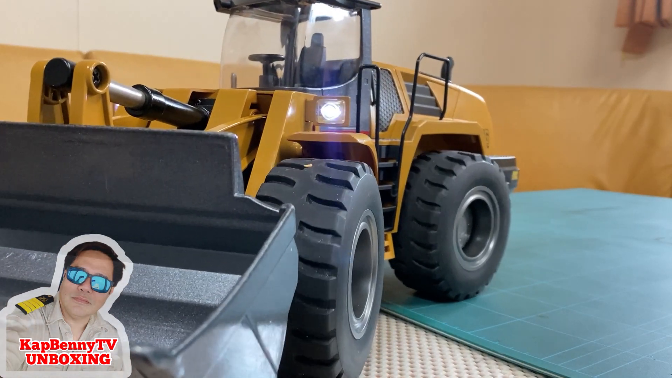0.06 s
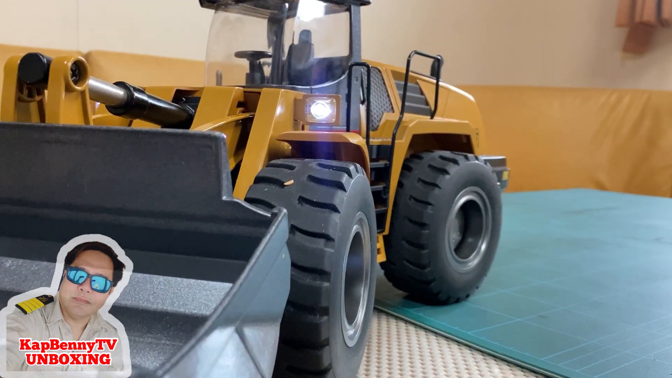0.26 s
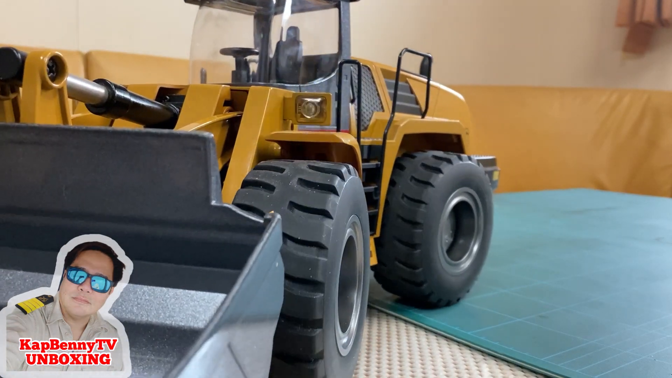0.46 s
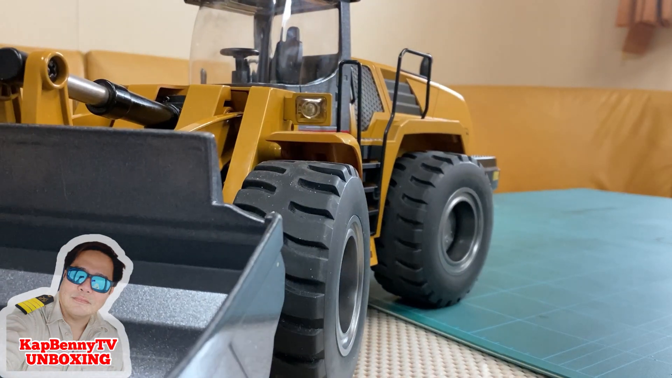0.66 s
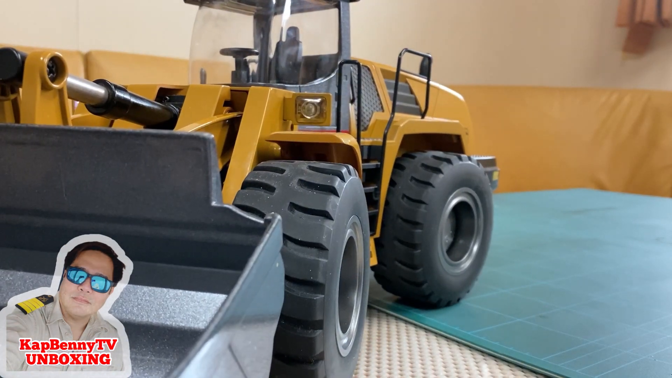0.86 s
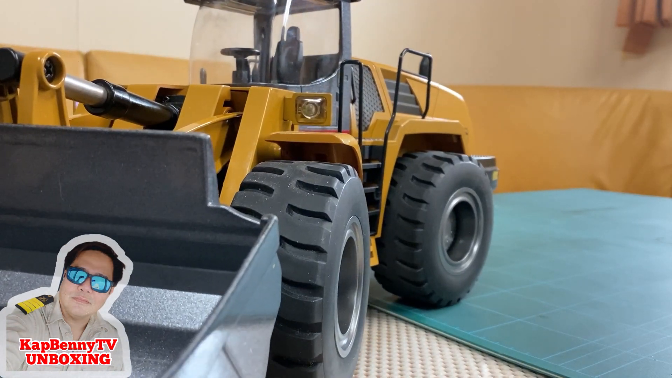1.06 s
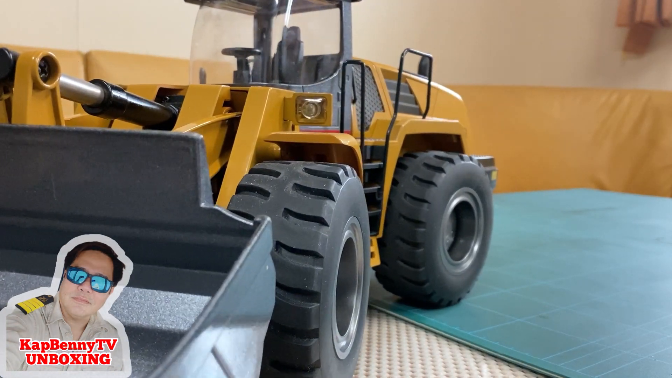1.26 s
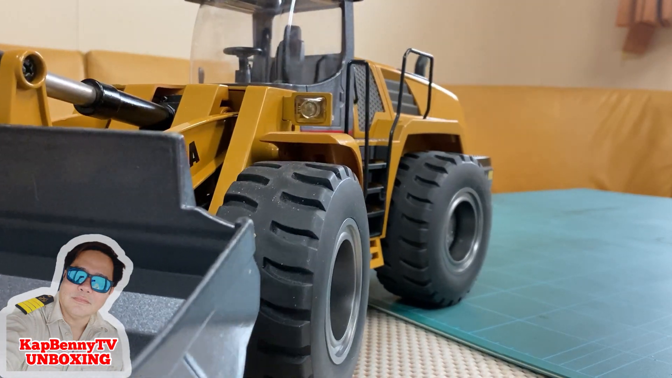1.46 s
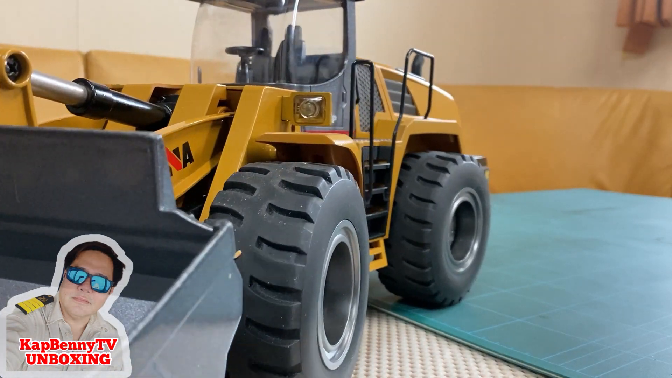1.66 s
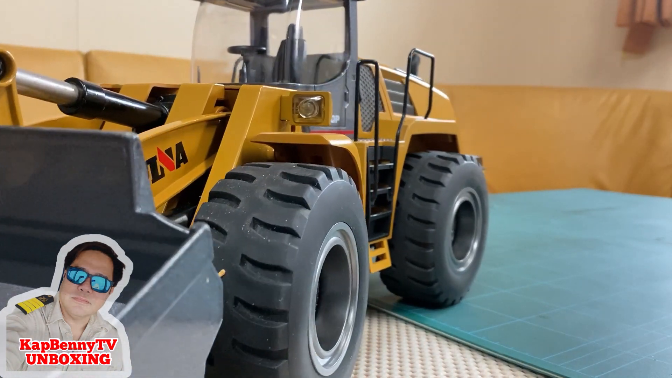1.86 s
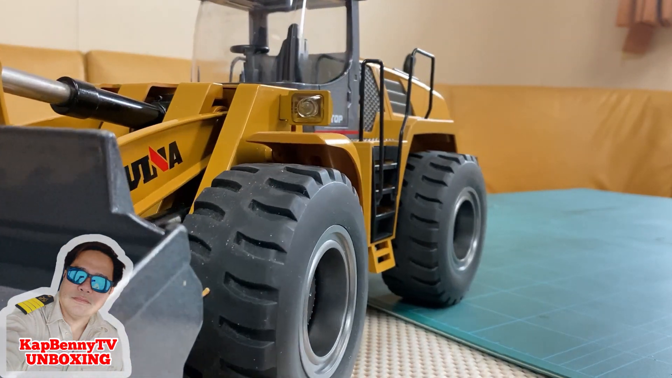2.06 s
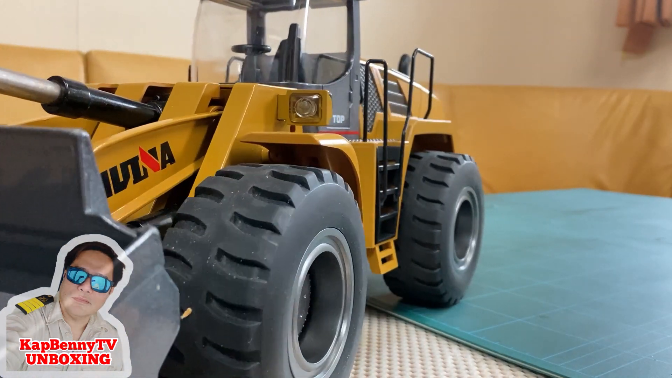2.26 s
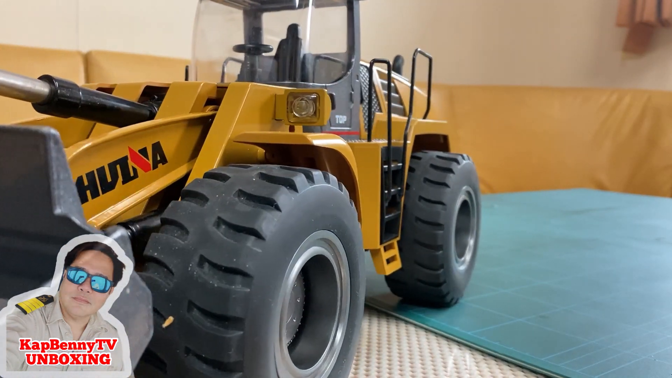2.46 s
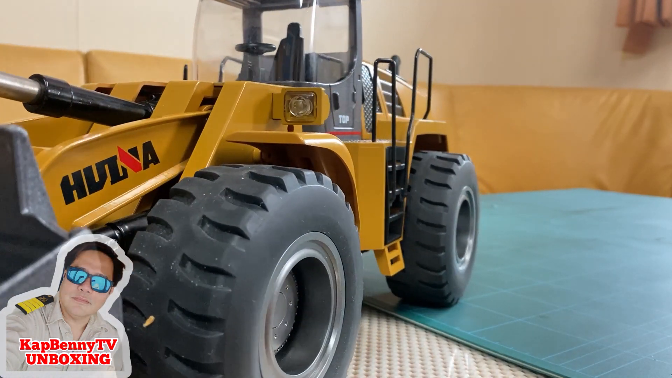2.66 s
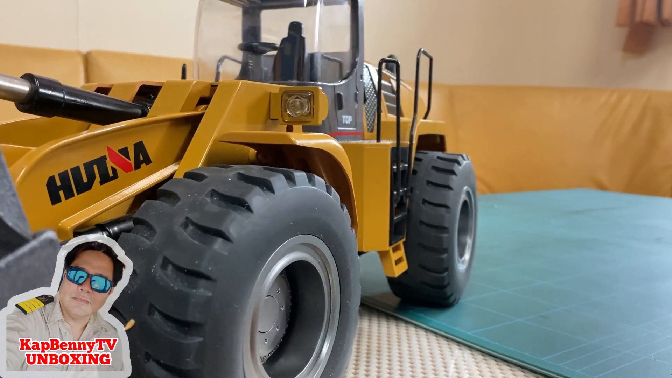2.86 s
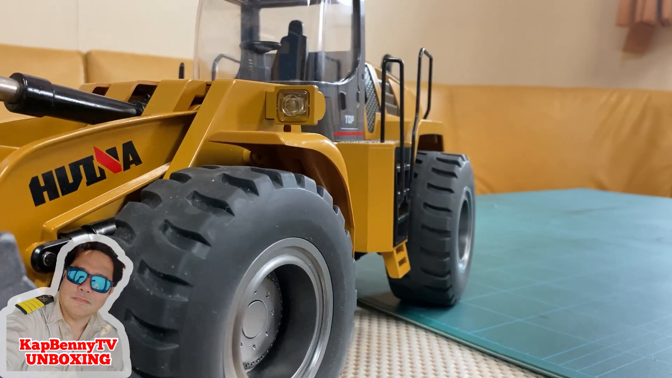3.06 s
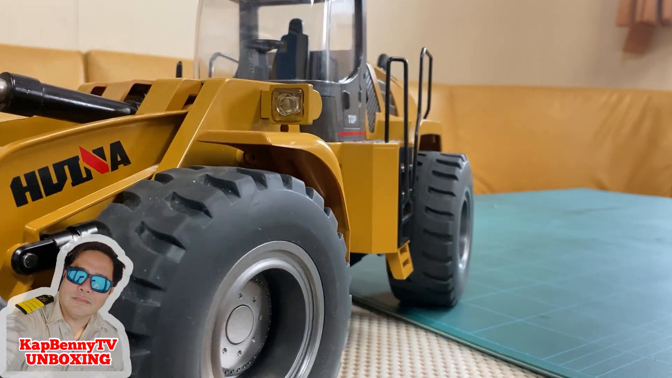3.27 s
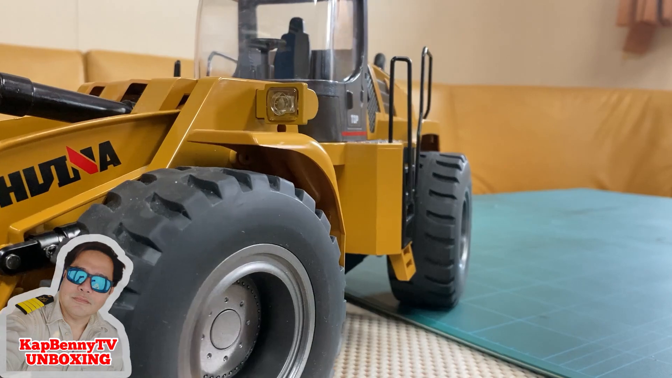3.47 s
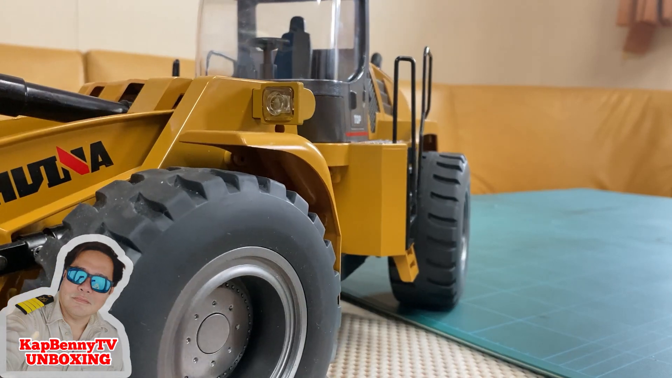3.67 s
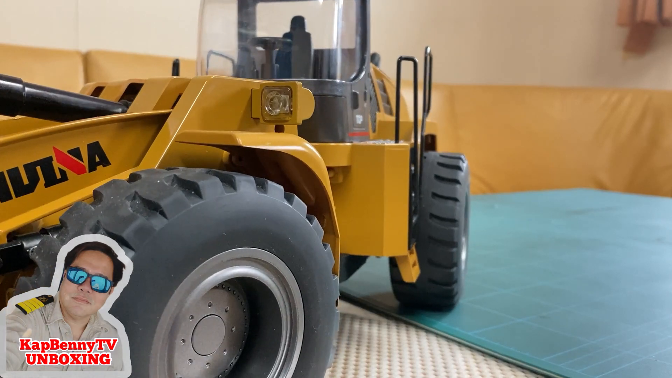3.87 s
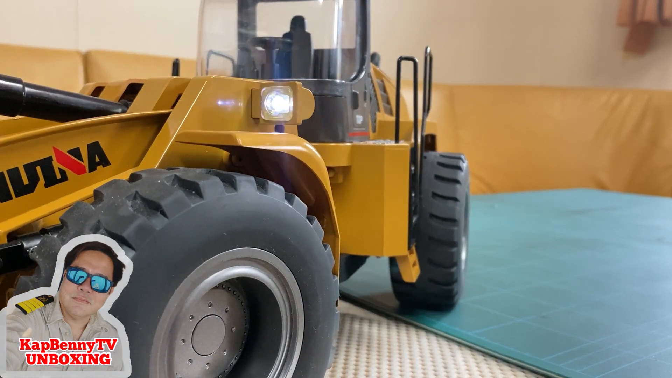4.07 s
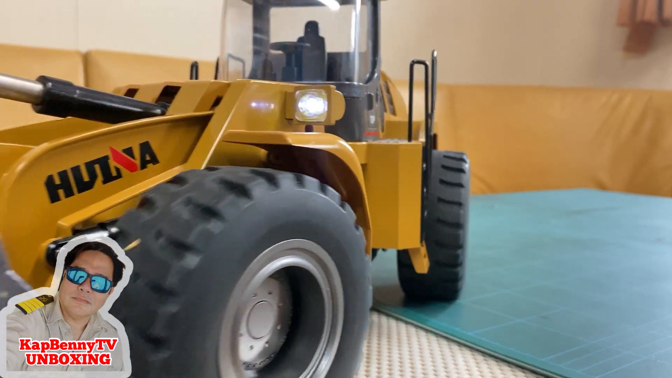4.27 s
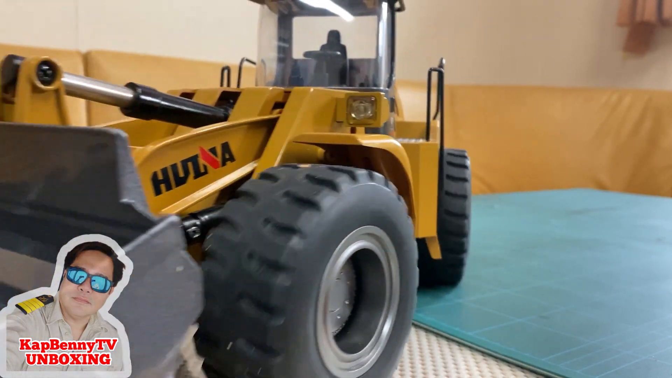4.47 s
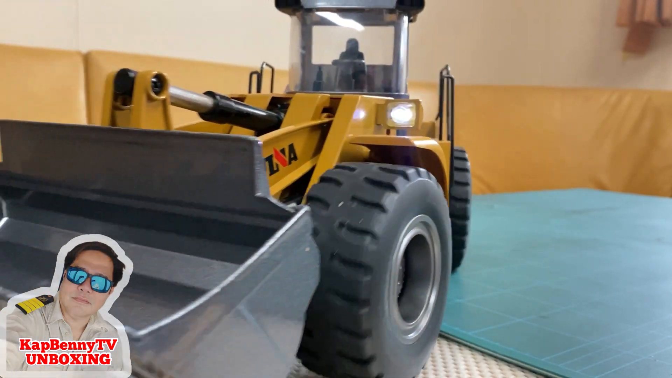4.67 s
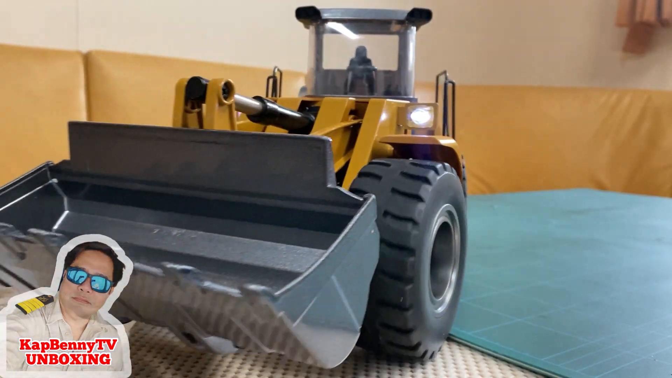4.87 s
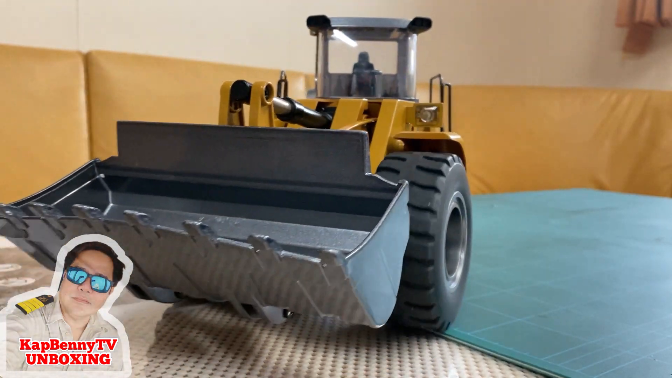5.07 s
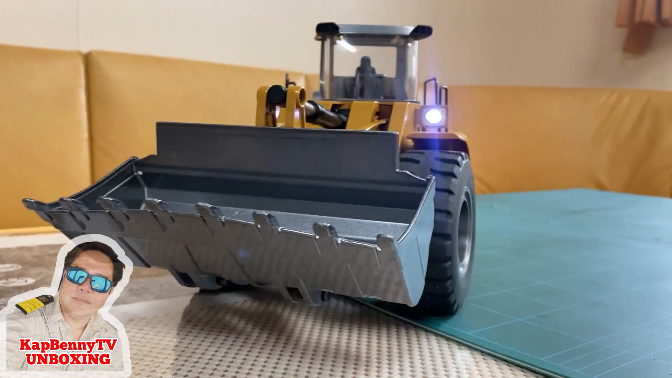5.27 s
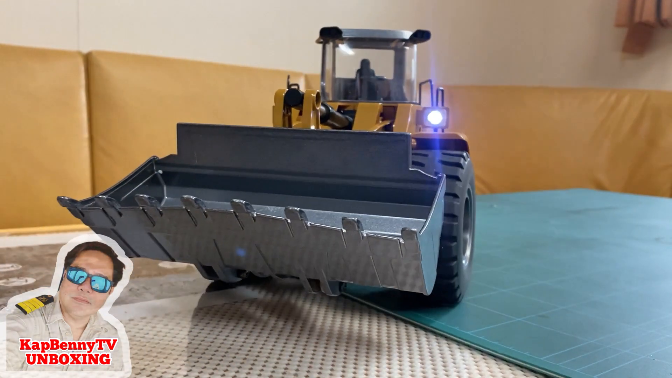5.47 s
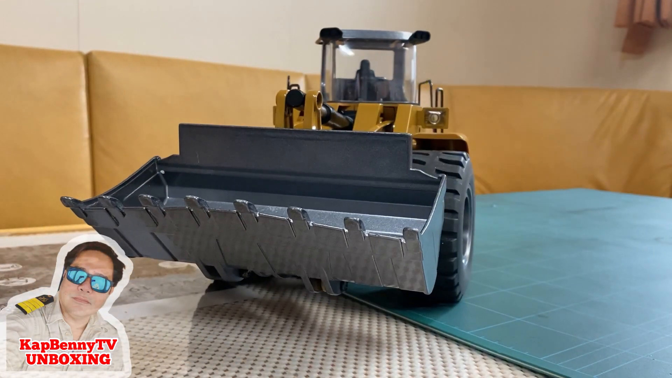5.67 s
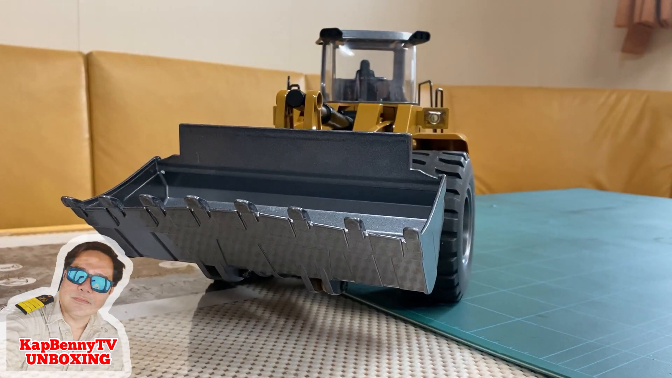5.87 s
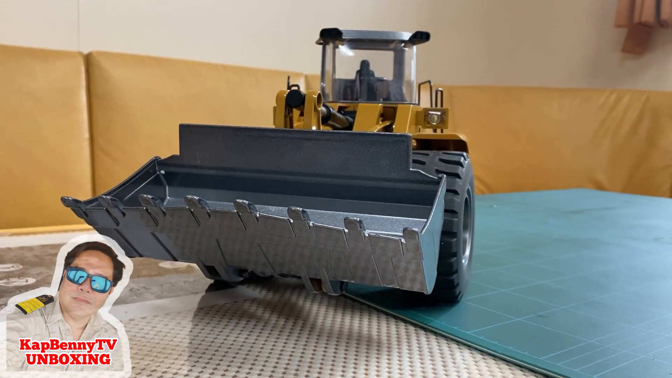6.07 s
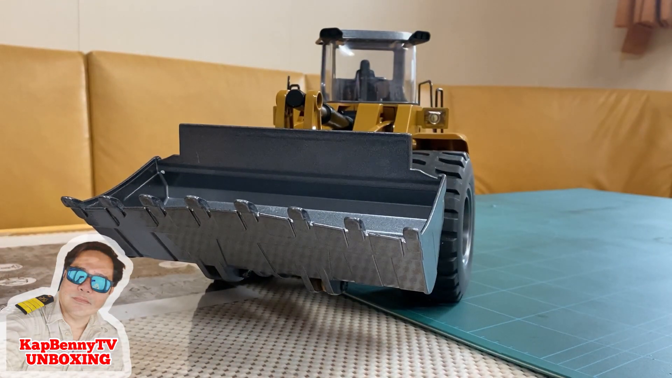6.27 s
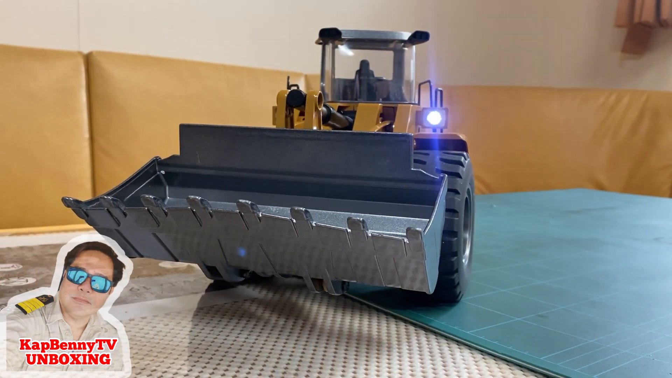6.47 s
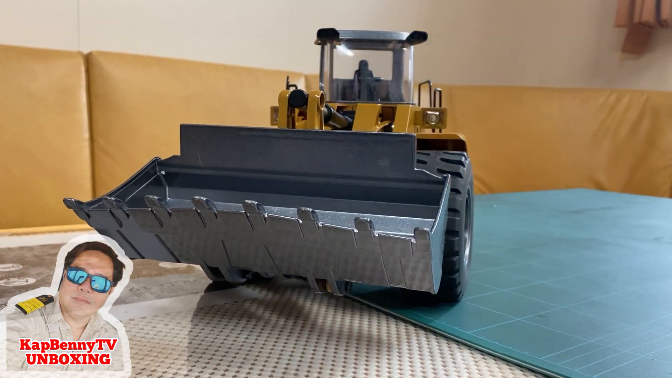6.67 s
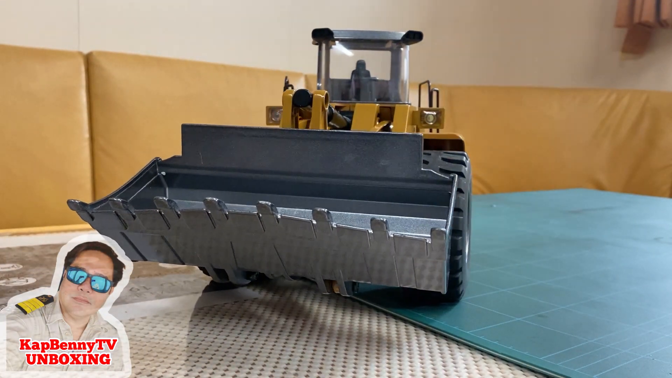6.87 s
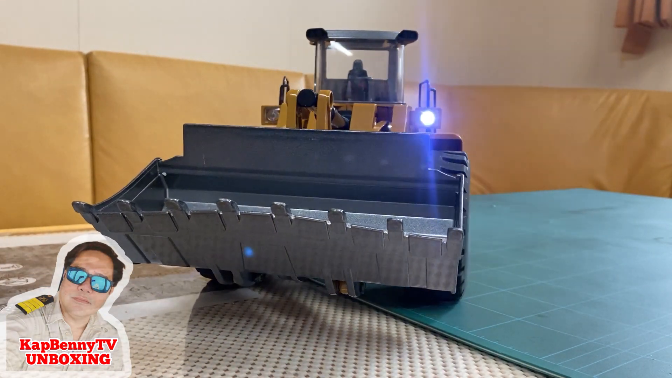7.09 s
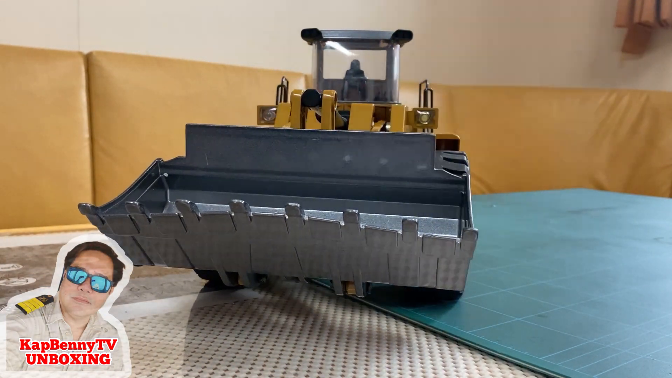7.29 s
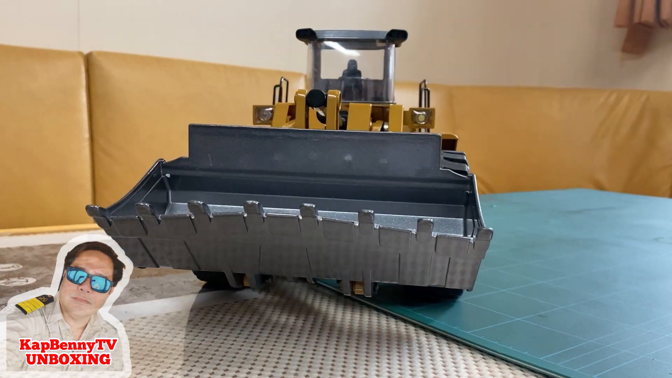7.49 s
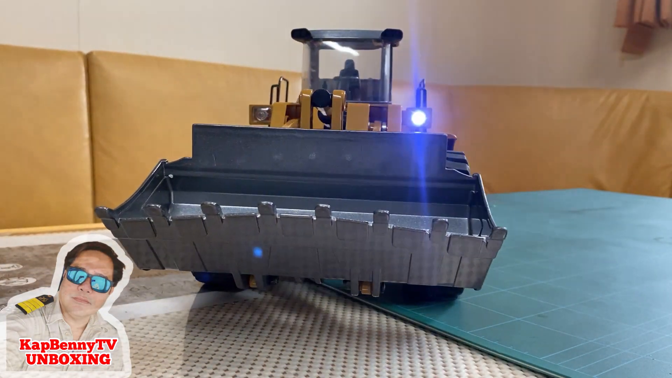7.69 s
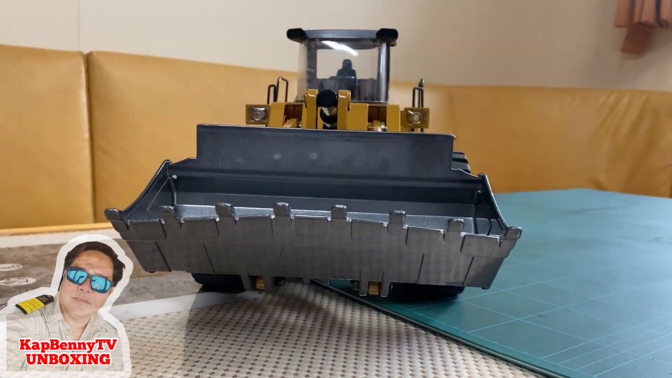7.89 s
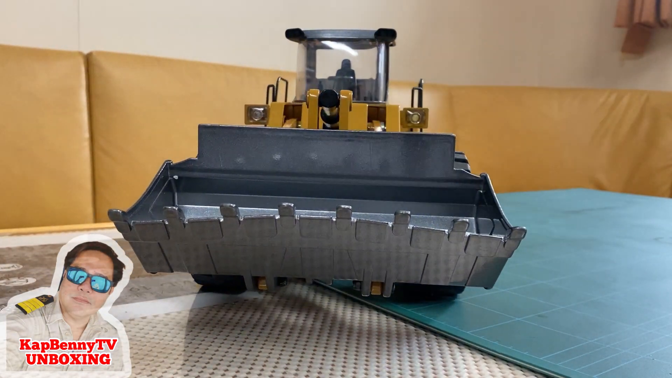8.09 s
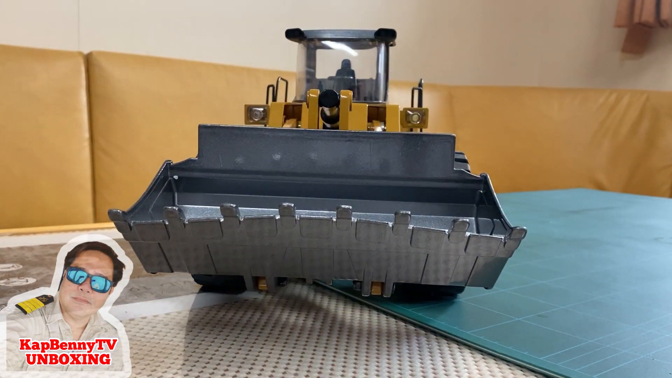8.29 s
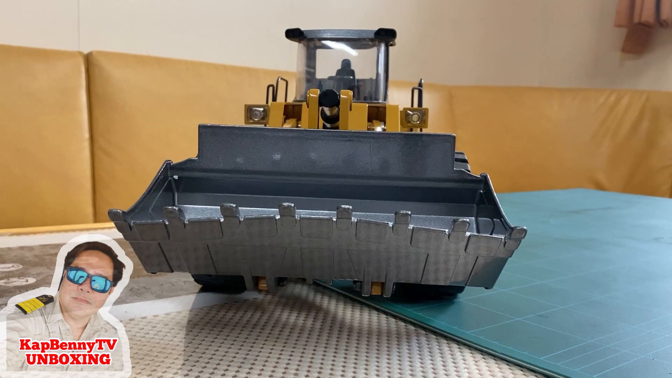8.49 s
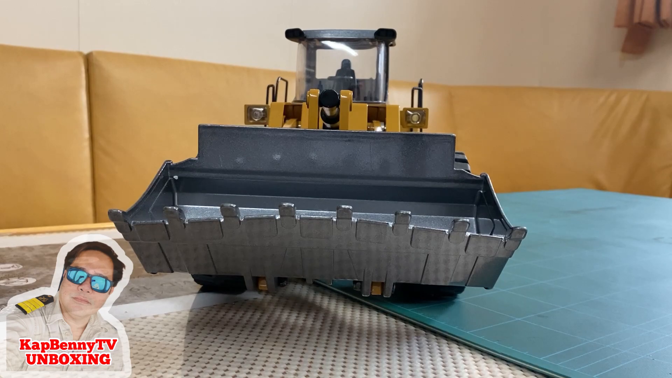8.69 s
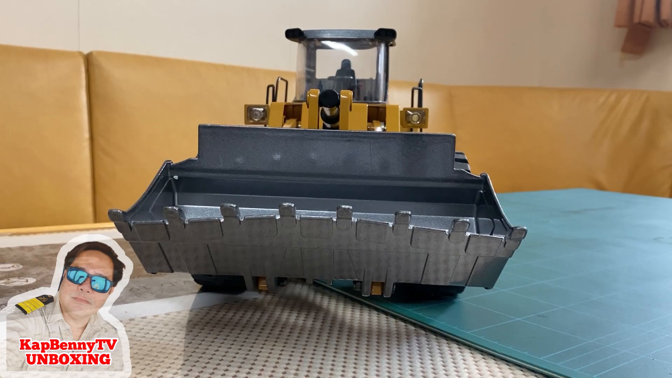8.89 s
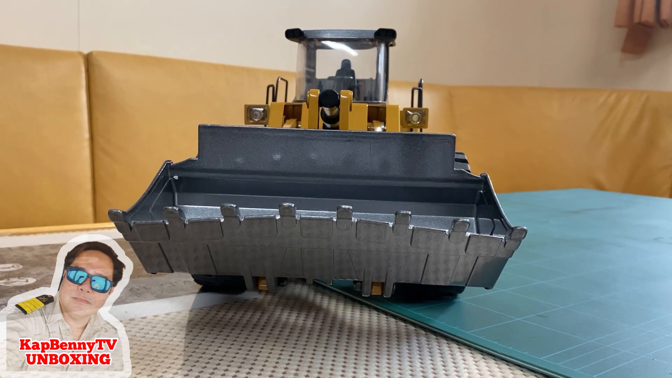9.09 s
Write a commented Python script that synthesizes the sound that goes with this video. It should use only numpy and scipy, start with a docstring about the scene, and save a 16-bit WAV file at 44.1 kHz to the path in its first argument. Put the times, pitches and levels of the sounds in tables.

```python
"""A radio-controlled model wheel loader works close by on the floor of a small room, where an appliance hums
low. First its drive gears rattle forward under the buzz of the speed controller, which chops the motor's
current. The buzz returns and the steering motor whines one way, its tones on multiples of the shaft speed. Then
another buzz, and the gears rattle back while the drive pinion sings; last, a buzz and the steering whines the
other way. Knocks and short chirps mostly mark where the gears start, catch or settle; a switch-on tick and a
steady ringing tone go with the steering buzz."""
import sys
import numpy as np
from scipy import signal
from scipy.fft import rfft, irfft, next_fast_len
from scipy.io import wavfile

SR = 44100
rng = np.random.default_rng(int(sys.argv[2]) if len(sys.argv) > 2 else 0)


def int16_out(signal):
    """Quantize to a 16-bit WAV file."""
    q = np.round(np.clip(np.atleast_2d(signal).T, -1, 1) * 32767)
    wavfile.write(sys.argv[1], SR, q.astype(np.int16))


N = 403074
T = np.arange(N) / SR  # time [s]

# how the steering and the drive lean to one side: (frequency [Hz], left minus right [dB])
STEER_SIDE = [(600, 7.5), (1400, 1), (2700, 1), (3700, 3), (6000, 7), (9000, 0)]
DRIVE_SIDE = [(60, -1.0), (110, 5), (200, 3), (380, 20), (700, 5), (1280, 5), (2370, 2.5), (4370, 6),
              (8070, 3), (14900, -4.5)]


def amp(db):
    """Decibels to gain."""
    return 10 ** (np.asarray(db) / 20)


def unit(x):
    """x at rms 1."""
    return x / np.sqrt(np.mean(x ** 2) + 1e-20)


def along(points, hz):
    """(frequency [Hz], value) points read on a log axis."""
    f, v = np.transpose(points)
    return np.interp(np.log(hz + 1), np.log(f + 1), v)


def curves(rows, t):
    """Each column after the time, read at the times t."""
    s, *cols = np.transpose(rows)
    return [np.interp(t, s, c) for c in cols]


def span(rows):
    """The samples that a table covers."""
    return (T >= rows[0][0]) & (T <= rows[-1][0])


def wobble(rate, t):
    """A random curve with rate knots a second."""
    return np.interp(t * rate, np.arange(8192), rng.standard_normal(8192))


def held(t, start, stop, attack_s, fall_db_per_s):
    """A gain that rises from start, holds, and dies away after stop."""
    return np.clip((t - start) / attack_s, 0, 1) * amp(-fall_db_per_s * np.maximum(t - stop, 0))


def filtered(x, response):
    """x times a response of frequency."""
    n = x.shape[-1]
    m = next_fast_len(n + SR // 4)
    return irfft(rfft(x, m) * response(np.fft.rfftfreq(m, 1 / SR)), m)[..., :n]


def coloured(x, spectrum):
    """x with the given spectrum, at rms 1."""
    return unit(filtered(x, lambda hz: amp(along(spectrum, hz))))


def ring(x, modes):
    """x through (frequency [Hz], width [Hz], level [dB]) resonances of alternating sign."""
    def response(f):
        total = 0
        for k, (centre, width, db) in enumerate(modes):
            damping = 1j * f * width
            total = total + (-1) ** k * amp(db) * damping / (centre ** 2 - f ** 2 + damping)
        return total
    return filtered(x, response)


def stereo(pair, alike):
    """Two unrelated signals become left and right with the given likeness."""
    turn = lambda hz: np.arccos(np.clip(along(alike, hz), -.99, .99)) / 2
    mid, side = filtered(pair, lambda hz: np.array([np.cos(turn(hz)), np.sin(turn(hz))]))
    return np.array([mid + side, mid - side])


def leaning(x, balance):
    """Each frequency is louder on one side, and the left leads by up to about a quarter cycle."""
    lead_rad, lead_hz = 1.75, 1110  # the largest lead, and where it nears that
    sides = [.5, -.5]

    def response(hz):
        lead = lead_rad * np.tanh(hz / lead_hz)
        return amp(np.outer(sides, along(balance, hz))) * np.exp(1j * np.outer(sides, lead))
    return filtered(x, response)


def impacts(turns, base_rate, bunching, spread_db):
    """Tooth impacts of random size, bunched at one point of each turn (base_rate: per second before bunching)."""
    # how alike the gears sound left and right: (frequency [Hz], likeness [-1 to 1])
    alike = [(600, 0.75), (2500, 0.6), (10000, 0.22)]
    chance = base_rate / SR * np.exp(bunching * np.cos(2 * np.pi * turns))
    sizes = amp(spread_db * rng.standard_normal(len(turns)).clip(-2, 2))
    hits = (rng.random(len(turns)) < chance) * sizes
    return stereo(hits * rng.standard_normal((2, len(turns))), alike)


def partial(turns, t, flutter_db, blur, beat):
    """One stereo tone of rms 1 that flutters and beats with its own reflections (blur [rad], beat: their strength)."""
    slow = t[::round(SR / 400)]  # gains move slowly, so 400 points a second will do
    drift = lambda: np.array([wobble(19, slow), wobble(19, slow)])
    sway = np.outer([1, -1], 0.3 * wobble(2.04, slow))  # opposite phase drift left and right
    direct = np.exp(1j * (blur * wobble(45, slow) + sway))
    reflected = drift() + 1j * drift()
    gain = direct + beat * (reflected + reflected[::-1] / 2)
    gain *= amp(flutter_db * wobble(22, slow) + 0.88 * wobble(8.8, slow))
    gain /= np.sqrt(np.mean(np.abs(gain) ** 2) / 2)
    tone = np.exp(2j * np.pi * (turns + rng.random()))
    return np.array([(np.interp(t, slow, g) * tone).real for g in gain])


def background():
    """An appliance's unsteady drone, the room's rumble and a soft rush of air, all from shaped noise."""
    # the appliance's hum: (frequency [Hz], half width [Hz], level [dB])
    hums = [(83.5, 5.1, -41), (60.6, 9.5, -49.5), (188, 8.4, -59.5)]
    # spectra of the rumble and the air: (frequency [Hz], relative level per Hz [dB])
    rumble, air = [(11, -53), (18, -23.5), (60, -2.5), (86, 0.5), (107, -5.5), (145, -12), (195, -14),
                   (296, -23.5), (450, -33.5), (580, -57), (990, -120)], [(180, -41), (300, -6), (540, -12), (600, -11), (677, -12), (849, -10),
                                   (1240, -8), (2160, -24.5), (4800, -25.5), (11000, -41.5), (14300, -102),
                                   (22000, -120)]
    # (frequency [Hz], left-right likeness [-1 to 1])
    alike = [(60, 0.96), (130, 0.99), (280, 0.67), (700, 0.038), (3000, 0.084)]
    noise = lambda: stereo(rng.standard_normal((2, N)), alike)
    drone = 0
    for hz, half, db in hums:
        drone = drone + amp(db) * unit(filtered(noise(), lambda f: 1 / (1 + ((f - hz) / half) ** 2)))
    return drone + amp(-40.5) * coloured(noise(), rumble) + amp(-55) * coloured(noise(), air)


def controller(runs, can, attack_s):
    """Each pulse of chopped current ticks the motor can, a little unevenly."""
    chop_hz, scatter_db, soften_hz = 191, 1.5, 3700
    phase = 2 * np.pi * chop_hz * T + 0.039 * wobble(120, T)
    pulses = np.diff(signal.sawtooth(phase), prepend=0) * amp(scatter_db * wobble(chop_hz, T))
    # the windings slow each edge of the current
    soft = filtered(pulses, lambda hz: 1 / (1 + 1j * hz / soften_hz) ** 2)
    level = sum(amp(db) * held(T, start, stop, attack_s, 300) for start, stop, db in runs)
    return leaning(level * unit(ring(soft, can)), DRIVE_SIDE)


def drive_buzz():
    """The controller chops the drive motor's current."""
    # when it buzzes: (start [s], stop [s], level [dB])
    runs = [(-.1, .44, -55), (4.035, 4.3, -44), (5.36, 5.52, -53)]
    # resonances of the motor can: (frequency [Hz], width [Hz], level [dB])
    can = [(970, 54, 0), (1360, 200, -10), (2490, 160, -6.5)]
    return controller(runs, can, attack_s=0.031)


def drive(start, stop, box, shaft_hz, crawl_db, crawl_click_db):
    """Loose spur gears rattle unevenly in their plastic case, louder and brighter with the throttle."""
    # (time [s], throttle [0-1])
    throttle_curve = [(4.14, 0.09), (4.25, 0.8), (4.41, 1), (4.75, 0.98), (5.23, 0.8), (5.47, 0.06)]
    # the gearbox case rings: (frequency [Hz], width [Hz], level [dB])
    box_modes = [(963, 49, 1), (1379, 28, 7.5), (1890, 43, 2), (2104, 81, 3.5), (2335, 37, 3),
                 (2580, 63, -10.5)]
    split_hz, ring_db = 3700, -5  # between rattle and tooth clicks; the case's ring against the rattle
    power = held(T, start, stop, attack_s=0.055, fall_db_per_s=300)
    on = power > .001
    t = T[on]
    throttle, = curves(throttle_curve, t)
    body_db = crawl_db + 10.5 * throttle
    click_db = crawl_click_db + 17 * throttle
    turns = np.cumsum(shaft_hz * (1 + .02 * wobble(8, t))) / SR
    lurch = amp(1.4 * wobble(60, t) + 0.7 * wobble(20, t))
    hits = impacts(turns, base_rate=8000, bunching=.35, spread_db=0.0) * lurch
    rattle = coloured(hits, box)
    low = filtered(rattle, lambda hz: 1 / (1 + (hz / split_hz) ** 16))
    blows = impacts(turns, base_rate=220, bunching=1.2, spread_db=0.0)  # sparser, to ring the case
    ringing = unit(ring(blows, box_modes))
    out = np.zeros((2, N))
    out[:, on] = amp(body_db) * unit(unit(low) + amp(ring_db) * ringing)
    out[:, on] += amp(click_db) * unit(rattle - low)
    return leaning(out * power, DRIVE_SIDE)


def drive_forward():
    """The gears, already turning, rattle forward at the lowest throttle."""
    # gearbox spectrum: (frequency [Hz], relative level per Hz [dB])
    box = [(260, -61), (450, -52), (565, -7.5), (758, -13), (939, -8), (1070, -7), (1290, -2), (1880, -2),
           (3620, -15.5), (4670, -0.5), (11000, -21.5), (14300, -87), (22000, -120)]
    return drive(-.1, .44, box, shaft_hz=193.6, crawl_db=-41, crawl_click_db=-57)


def room(x):
    """The room's short answer: noise that dies at its own pace in each band."""
    # (frequency [Hz], time to fall 60 dB [s])
    decay = [(300, 0.025), (2000, 0.44), (10000, 0.046)]
    hz, t, z = signal.stft(rng.standard_normal((2, SR // 2)), SR, nperseg=256)
    fading = z * amp(-60 * t / along(decay, hz)[:, None])
    tail = signal.istft(fading, SR, nperseg=256)[1]
    return signal.fftconvolve(x, tail / np.linalg.norm(tail[0]), axes=1)[:, :N]


def knocks():
    """The gears drop back against their play and knock the chassis, whose plastic rings; one knock is the
    steering controller's tick as it switches on."""
    # the gears jolt as they start, catch or settle, and at 6.305 s the steering controller ticks as it switches
    # on: (time [s], peak level [dB])
    jolts = [(0.452, -51), (2.589, -43), (3.842, -35), (4.170, -25), (4.357, -20), (4.438, -24),
             (5.625, -40), (6.305, -36), (7.986, -31), (8.050, -30)]
    # resonances of the chassis: (frequency [Hz], width [Hz], level [dB])
    plastic = [(940, 92, -0.5), (1320, 110, 1.5), (1830, 190, -3), (2530, 140, -1.5), (3150, 160, -10)]
    out = np.zeros((2, N))
    t = np.arange(SR // 10) / SR
    for s, db in jolts:
        burst = rng.standard_normal((2, len(t))) * amp(-60 * t / 0.013)  # falls 60 dB in 13 ms
        knock = ring(burst, plastic)
        out[:, round(s * SR):][:, :len(t)] += amp(db) * knock / np.abs(knock).max()
    return out


def steering_buzz():
    """The controller chops the steering motor's current."""
    # when it buzzes: (start [s], stop [s], level [dB])
    runs = [(.816, 0.98, -47), (6.304, 6.34, -49.5)]
    # resonances of the motor can: (frequency [Hz], width [Hz], level [dB])
    can = [(604, 50, 2), (990, 64, 7), (1500, 390, -1), (2170, 140, 8.5), (2320, 140, 8.5),
           (2700, 370, 1.5)]
    return controller(runs, can, attack_s=0.0033)


def chirps():
    """Short rough glides that swell and fade: mostly a gear stage singing as a motor takes up or drops its
    load; the first, a steady 955 Hz tone, rings with the steering buzz as it sets in."""
    # (time [s], length [s], start frequency [Hz], end frequency [Hz], level [dB])
    glides = [(0.84, 0.098, 955, 955, -43.5), (1.039, 0.17, 1460, 1667, -39.5),
              (1.077, 0.14, 2800, 3240, -42), (1.172, 0.17, 665, 620, -47), (1.181, 0.13, 2760, 2740, -44),
              (1.225, 0.1, 6800, 6900, -39.5), (1.358, 0.162, 1750, 1660, -45),
              (1.38, .38, 3380, 3280, -52.5), (3.71, 0.092, 1640, 1420, -34),
              (3.717, 0.09, 1320, 1166, -34.5), (3.736, 0.076, 1140, 1056, -39),
              (5.281, 0.28, 1392, 1328, -40), (6.49, 0.083, 1500, 1650, -44),
              (6.52, 0.073, 557, 643, -43.5), (6.56, 0.11, 810, 922, -44), (7.788, 0.13, 2160, 2025, -43),
              (7.841, 0.1, 625, 580, -42), (7.912, 0.038, 2260, 1890, -34)]
    out = np.zeros((2, N))
    for s, length, start_hz, end_hz, db in glides:
        t = np.arange(round(length * SR)) / SR
        turns = np.cumsum(np.linspace(start_hz, end_hz, len(t))) / SR
        glide = np.hanning(len(t)) * partial(turns, t, flutter_db=6.5, blur=1.0, beat=0.28)
        out[:, round(s * SR):][:, :len(t)] += amp(db) * glide
    return leaning(out, STEER_SIDE)


def steering(shaft, orders, brush, chatter, mesh_order, stop_s, spin_up_s,
             gear_db, gear_growth, gear_rise_s, tone_db, brush_db, brush_growth, brush_rise_s,
             mesh_db, mesh_flutter_db, chatter_db, hiss_db):
    """Gear tones and brush buzz ride on multiples of the shaft speed and grow with it; slow, loose teeth chatter."""
    # the brush hiss surges and dips as the motor pulls away: (middle [s], half length [s], extra level [dB])
    surges = [(1.024, 0.055, 3.5), (1.124, 0.034, -14), (1.26, 0.057, 7.5), (6.438, 0.045, 15)]
    # the tooth mesh bites and its tone rings out: (start [s], stop [s], extra level [dB])
    bites = [(1.286, 1.357, 6.5), (1.81, 2.024, 7.5), (2.085, 2.19, 6), (2.25, 2.5, 10.5),
             (2.585, 2.604, 4), (2.7, 3.11, 12.5), (3.161, 3.634, 10.5), (6.623, 6.81, 10.5),
             (6.835, 6.877, 5), (6.977, 7.102, 5), (7.19, 7.26, 4.5), (7.297, 7.387, 5.5),
             (7.785, 7.825, 10)]
    # case peaks and notches that the tones glide through: (frequency [Hz], half width [Hz], level [dB])
    case_peaks = [(942, 28, 7), (1776, 14, -8), (2014, 40, 4.5), (2853, 40, 1.5), (3373, 55, 5),
                  (3480, 45, -3.5), (3700, 57, 6.5), (4410, 57, 6), (5580, 48, 2)]
    # the small case hardly radiates the lowest tones: (frequency [Hz], level [dB])
    case_low = [(510, -29), (605, -0.5)]
    slack_pace, slack_width = 0.862, 0.034  # teeth come loose below this share of cruising speed
    tight_slack = 0.11  # share of chatter left under load
    body_share = 0.55  # of a tone's level: the body's resonances; the rest is the gears' own pattern
    hiss_top_hz, coast_db_per_s = 10950, 230  # the sound dies once the power is cut

    on = span(shaft)
    t = T[on]
    speed, = curves(shaft, t)
    cruise = np.percentile(speed, 65)
    pace = speed / cruise
    turns = np.cumsum(speed) / SR + .0035 * wobble(70, t)  # uneven turning widens the high orders
    looseness = 1 / (1 + np.exp((pace - slack_pace) / slack_width))
    slack = np.clip(tight_slack + (1 - tight_slack) * looseness, .02, .995)

    gears = gear_db + gear_growth * 20 * np.log10(pace)
    brushes = brush_db + brush_growth * 20 * np.log10(pace)
    surge_db = sum(db * np.exp(-((t - s) / half) ** 2) for s, half, db in surges)
    bite_db = sum(db * held(t, start, stop, 0.02, 280) for start, stop, db in bites)

    body = [(k * cruise, db) for k, db in enumerate(orders, 3)]
    body += [(hz, db - 9) for hz, db in brush if hz > body[-1][0]]
    grid = np.arange(SR // 2)
    case = sum(db * np.exp(-((grid - hz) / half) ** 2) for hz, half, db in case_peaks)

    def order_level(k):
        fixed_body = body_share * along(body, k * speed)
        own_pattern = (1 - body_share) * along(body, k * cruise)
        return fixed_body + own_pattern + np.interp(k * speed, grid, case)

    # the tooth mesh follows the load
    whine = partial(mesh_order * turns, t, flutter_db=mesh_flutter_db, blur=0.61, beat=.06)
    whine = amp(gears + mesh_db + bite_db) * whine
    tones = 0
    for k in range(3, 18):
        if k != mesh_order:
            level = gears + tone_db + order_level(k) + along(case_low, k * speed)
            tones += amp(level) * partial(k * turns, t, flutter_db=1.5, blur=0.63, beat=min(k / 20, .55))
    buzz = 0
    for k in range(18, 76):
        buzz += amp(order_level(k)) * partial(k * turns, t, flutter_db=2.5, blur=k / 45, beat=.55)
    buzz = unit(buzz) * np.sqrt(1 - slack)

    # loose brushes hiss, loose teeth chatter
    hiss = coloured(impacts(turns, base_rate=8000, bunching=.45, spread_db=1.5), brush)
    hiss = hiss * amp(hiss_db + surge_db) * np.sqrt(slack)
    hiss = filtered(hiss, lambda hz: 1 / (1 + (hz / hiss_top_hz) ** 10))
    teeth = coloured(impacts(turns, base_rate=1500, bunching=.8, spread_db=0.0), chatter)
    teeth = teeth * amp(gears + chatter_db) * np.sqrt(slack)

    rise = lambda seconds: np.minimum((t - t[0]) / seconds, 1)
    engaged = rise(gear_rise_s) ** 2 * np.sqrt(1 - slack)
    brush_gain = amp(brushes + 1.4 * wobble(35, t)) * rise(brush_rise_s)
    out = np.zeros((2, 2, N))  # the mesh tone, and all the rest
    out[0][:, on] = engaged * whine
    out[1][:, on] = engaged * tones + teeth + brush_gain * (buzz + hiss)
    power = held(T, t[0], stop_s, spin_up_s, coast_db_per_s / 2) ** 2  # squaring doubles the fall
    return leaning(out * power, STEER_SIDE)


def steering_out():
    """The steering motor turns one way, its mesh whining on shaft order 7."""
    # (time [s], shaft speed [turns per s])
    shaft = [(0.86, 140), (0.96, 155.9), (1.04, 154.0), (1.19, 204.3), (1.27, 212.2), (1.39, 190.5),
             (1.54, 183.2), (1.67, 184.5), (1.82, 198.4), (2.24, 198.4), (2.4, 209.2), (2.86, 201.3),
             (3.03, 205.6), (3.61, 200.4), (3.7, 193.4), (3.75, 178.2), (3.95, 173.4)]
    # the whine at cruising speed, shaft orders 3, 4, 5 and so on: (level [dB])
    orders = [-9.5, -13, -17.5, -7, 8, -6.5, -3, -17.5, -7, -6.5, -9.5, -2.5, -6, -9.5, -6, -20.5, -23, -13,
              -19.5, -17, -18, -8, -13, -12.5, -13, -9.5, -19.5, -12, -22, -16, -13, -17, -12, -24, -6.5,
              -24, -7, -14, -15, -24]
    # brush buzz and gear chatter: (frequency [Hz], relative level per Hz [dB])
    brush, chatter = [(2500, -32), (3500, -1), (4100, -7.5), (5200, -1.5), (6500, -4), (7650, -3.5),
                      (8600, -10.5), (9900, -1.5), (10700, -8.5), (11400, -6.5), (12200, -13), (13300, -16),
                      (15000, -20)], [(260, -54), (450, -23), (613, -18), (738, -13), (933, -6.5),
                                         (1330, -7.5), (1560, 2), (1780, -8), (2490, -5.5), (2780, -4),
                                         (3400, -9), (4000, -29), (5460, -48), (9240, -120)]
    return steering(shaft, orders, brush, chatter, mesh_order=7, stop_s=3.784, spin_up_s=0.15,
                    gear_db=-37.5, gear_growth=1.3, gear_rise_s=0.13, tone_db=-6.5,
                    brush_db=-42.5, brush_growth=2.1, brush_rise_s=0.041,
                    mesh_db=-11.5, mesh_flutter_db=1.0, chatter_db=-1.0, hiss_db=3.5)


def drive_reverse():
    """The gears rattle back, with the throttle opened fully for a moment."""
    # gearbox spectrum: (frequency [Hz], relative level per Hz [dB])
    box = [(260, -59), (450, -35), (604, -12), (728, -13.5), (902, -4.5), (1220, -2), (1700, -1.5),
           (2240, -2), (2850, -7.5), (3670, -14), (4400, -12.5), (5150, -6.5), (5800, -11), (8420, -18),
           (9880, -17.5), (11000, -29), (14300, -48), (22000, -120)]
    return drive(4.04, 5.51, box, shaft_hz=236.8, crawl_db=-41.57, crawl_click_db=-57.5)


def meshing():
    """The drive pinion sings a rough, wavering note; out of true, it adds weaker tones one turn rate apart."""
    # the note in reverse, following the speed of the wheels: (time [s], frequency [Hz], level [dB])
    pinion = [(4.14, 978, -58), (4.22, 1060, -42), (4.3, 1127, -43), (4.38, 1223, -36.5), (4.46, 1231, -35),
              (4.53, 1182, -51), (4.6, 1215, -37), (4.73, 1153, -36.5), (4.81, 1185, -38),
              (4.98, 1153, -44), (5.07, 1103, -38.5), (5.22, 1081, -44), (5.36, 1043, -60)]
    # the pinion's turn orders 8, 9, 10 and so on: (level against the note [dB])
    orders_db = [-10.5, -9, 0, -8, -10, -9, -16, -17, -11, -15, -13.5, -10, -6, -12.5]
    teeth = 10
    on = span(pinion)
    t = T[on]
    hz, db = curves(pinion, t)
    turns = (np.cumsum(hz) / SR + .11 * wobble(130, t)) / teeth
    out = np.zeros((2, N))
    for k, order_db in enumerate(orders_db, 8):
        flutter_db, beat = (2, .2) if k == teeth else (3.5, .45)
        tone = partial(k * turns, t, flutter_db=flutter_db, blur=0.66, beat=beat)
        out[:, on] += amp(db + order_db) * tone
    return leaning(out, DRIVE_SIDE)


def steering_back():
    """The steering motor turns the other way, its mesh whining on shaft order 13."""
    # (time [s], shaft speed [turns per s])
    shaft = [(6.32, 149.8), (6.478, 162.1), (6.558, 195), (6.624, 229), (6.718, 231), (6.898, 225.2),
             (7.416, 224.4), (7.804, 214.7), (7.904, 204.3), (8.004, 164.3), (8.14, 140)]
    # the whine at cruising speed, shaft orders 3, 4, 5 and so on: (level [dB])
    orders = [-4, -9, -10, -5, -7.5, -13, -2.5, -7, -9.5, -7, 6, -8, -12.5, -9, -2, -16, -12, -16, -14, -19,
              -10, -5, -6.5, -9.5, -13, -20, -19, -8, -6, -8.5, -14, -4, -2, -8, -21, -23, -14, -13, -7,
              -23]
    # brush buzz and gear chatter: (frequency [Hz], relative level per Hz [dB])
    brush, chatter = [(2500, -18), (3600, -0.5), (4300, -8.5), (5450, 0.5), (6300, -3.5), (7900, -1),
                      (8500, -9), (10400, -5), (11500, -15), (12300, -25), (15000, -24)], [(260, -64), (450, -49), (601, -5), (679, -13), (933, -4),
                                          (1550, -4.5), (1790, -12), (2050, -3.5), (2330, -6.5),
                                          (4200, -14), (5460, -14), (9240, -120)]
    return steering(shaft, orders, brush, chatter, mesh_order=13, stop_s=7.99, spin_up_s=0.067,
                    gear_db=-36.5, gear_growth=3.6, gear_rise_s=0.36, tone_db=-5.5,
                    brush_db=-36.0, brush_growth=4.8, brush_rise_s=0.47,
                    mesh_db=-6.0, mesh_flutter_db=4.0, chatter_db=2.0, hiss_db=4.0)


def scene():
    """The loader's four moves in the humming room."""
    loader = drive_buzz() + drive_forward() + knocks() + steering_buzz() + chirps()
    loader += drive_reverse() + meshing()
    whine, rest = steering_out() + steering_back()
    loader += rest
    # the mesh tone faces the listener and excites the room less
    answer = amp(-11) * room(loader + .25 * whine)
    return loader + whine + answer + background()


def record(dry):
    """Nothing from 15.3 kHz up is kept."""
    return filtered(dry, lambda hz: hz < 15300)


dry = scene()
out = record(dry)
int16_out(out)
```